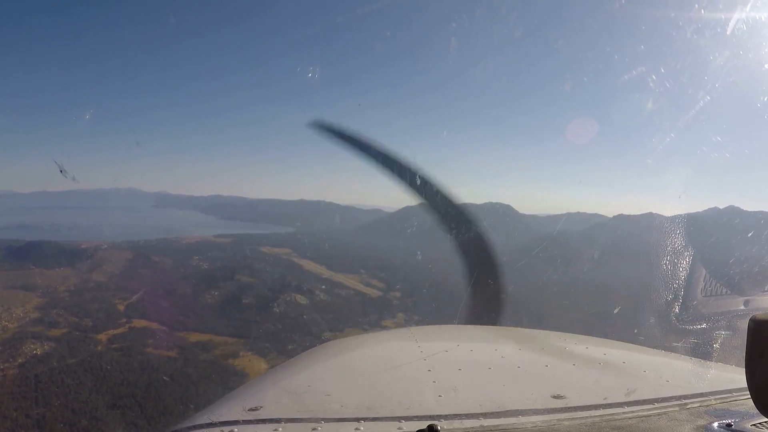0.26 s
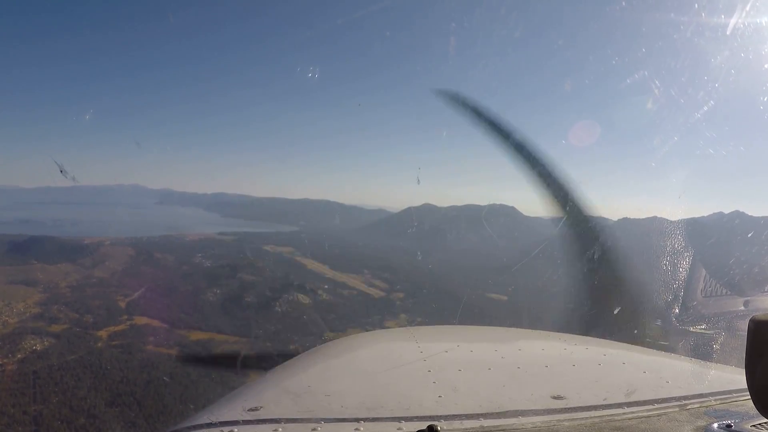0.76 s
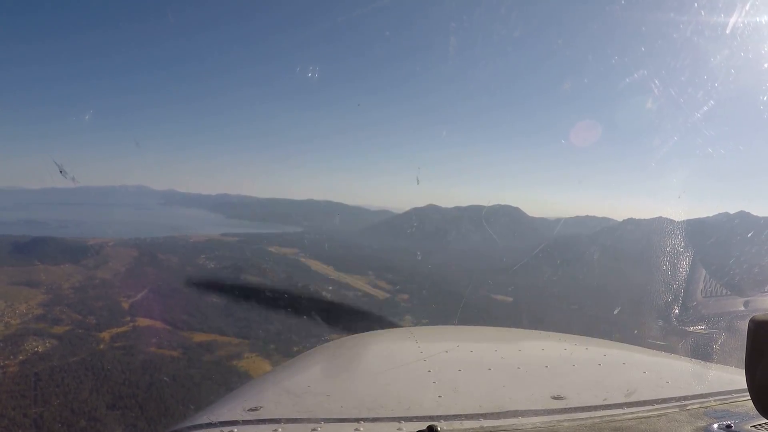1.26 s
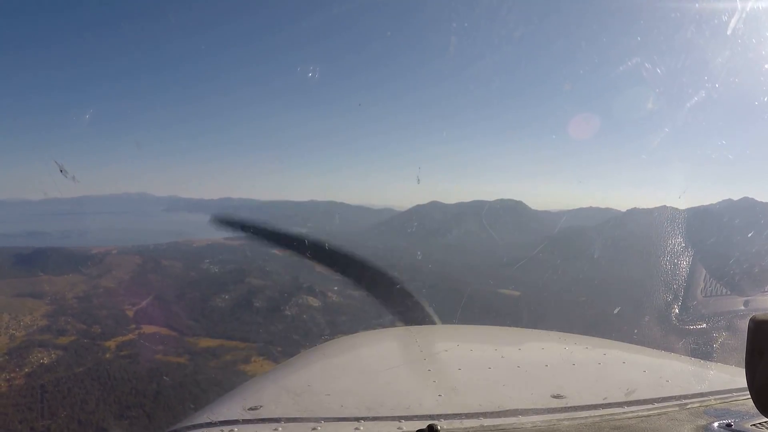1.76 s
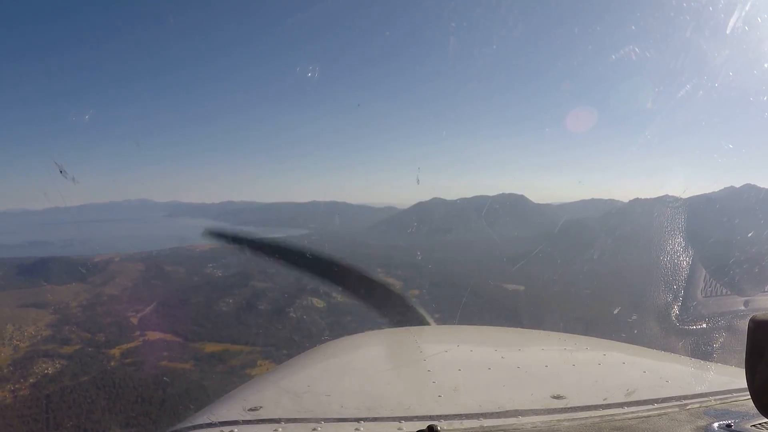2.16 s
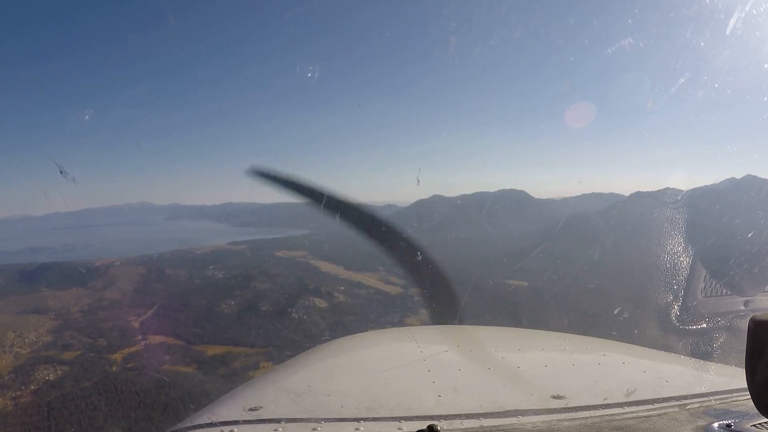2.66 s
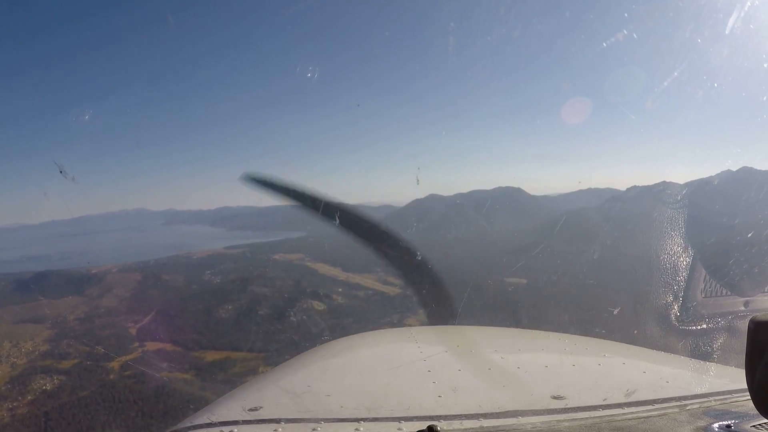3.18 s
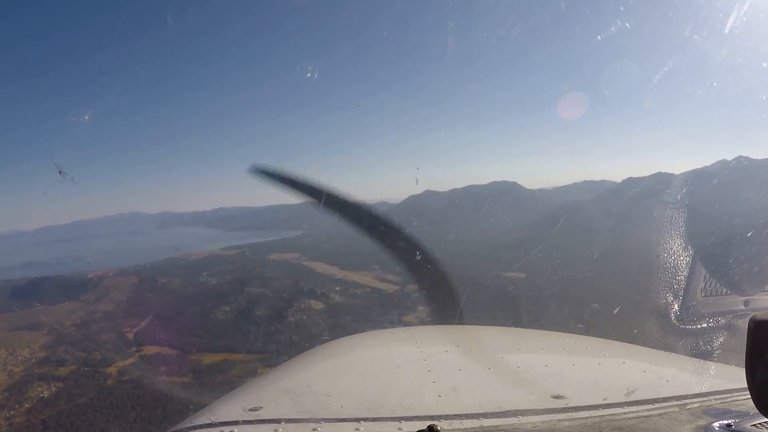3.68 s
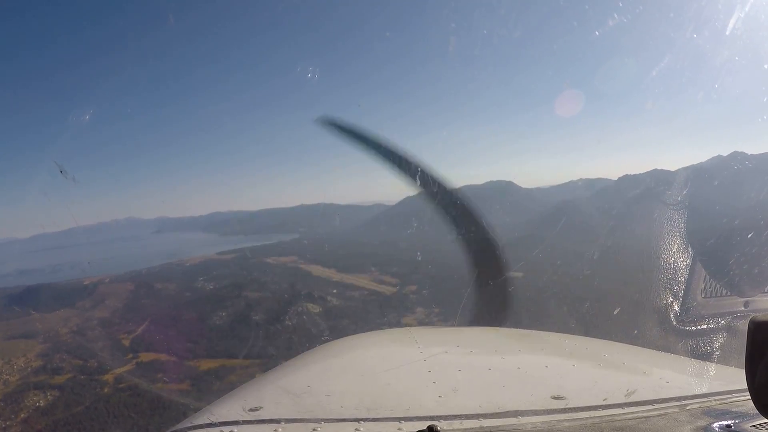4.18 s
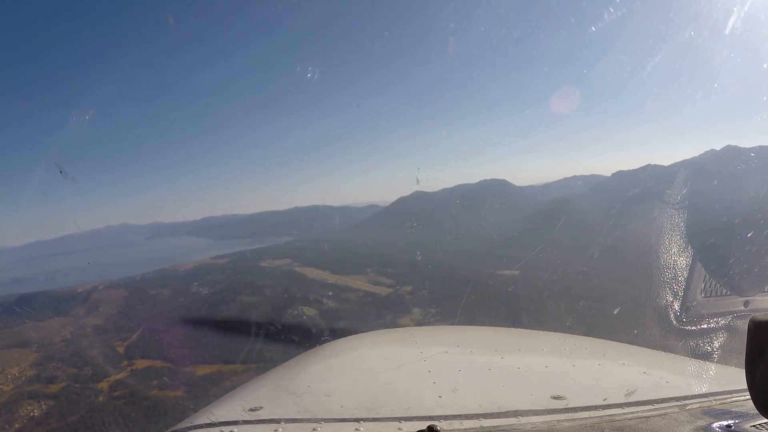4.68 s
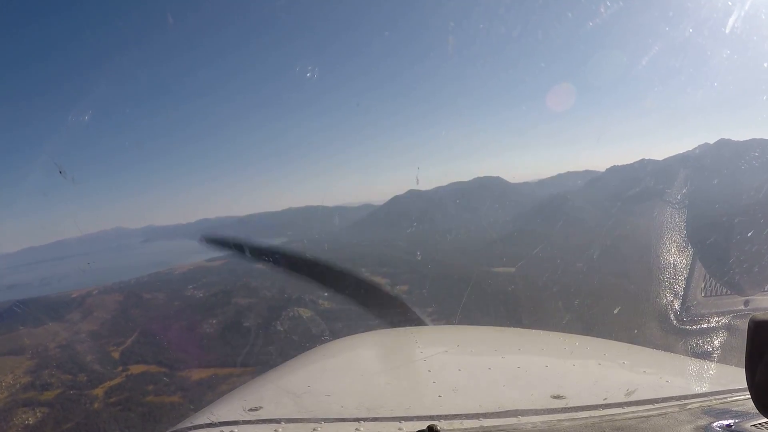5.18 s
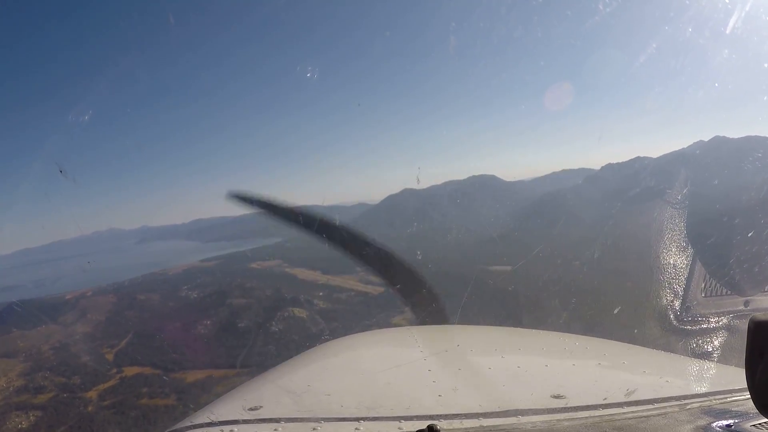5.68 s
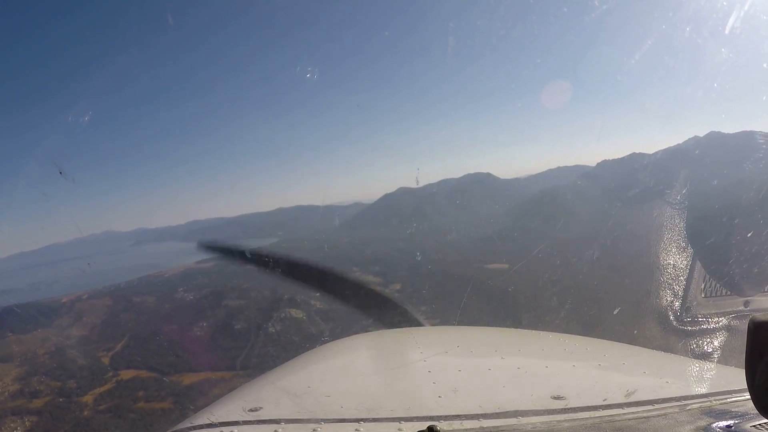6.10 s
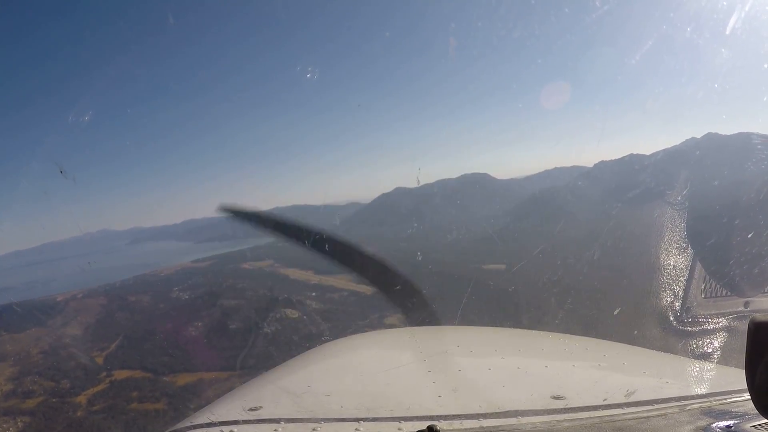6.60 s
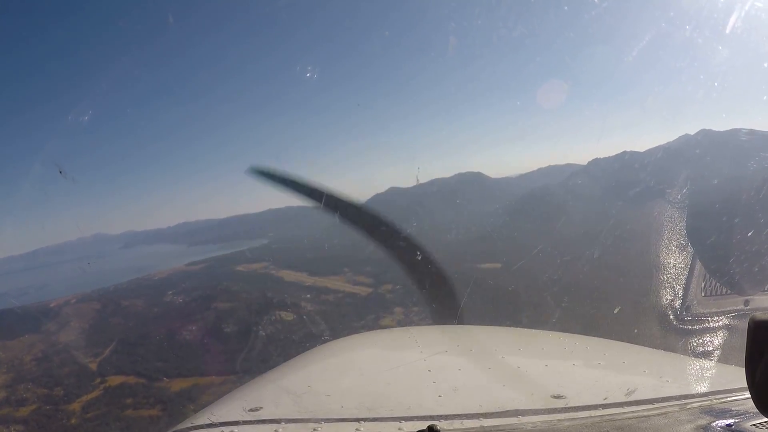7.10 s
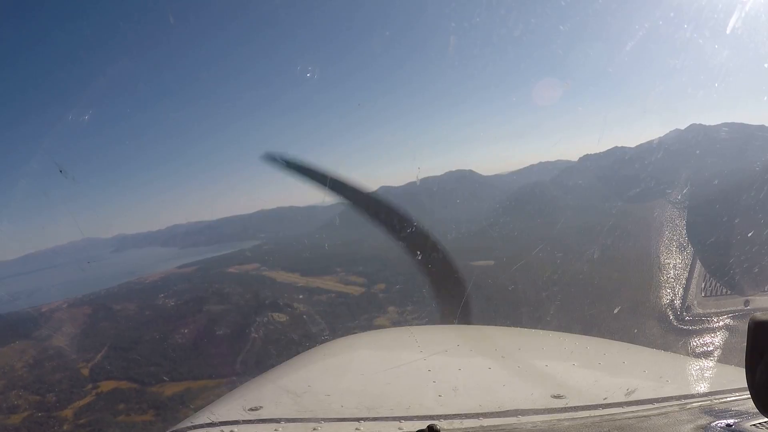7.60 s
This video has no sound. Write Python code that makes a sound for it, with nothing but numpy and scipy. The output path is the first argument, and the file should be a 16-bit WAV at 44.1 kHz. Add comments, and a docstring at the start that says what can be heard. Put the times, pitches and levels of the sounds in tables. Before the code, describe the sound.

Continuous cockpit noise of a light propeller aircraft: deep bassy hum from engine and blades together, faint higher engine tones, and a dense coloured rush of slipstream. The level stays almost even from beginning to end. Just before four seconds, two tiny puffs of crisp high noise pass, while engine speed wavers barely noticeably. The sound is enclosed and boxy, captured inside the small cabin.

```python
"""Inside the cockpit of a light four-cylinder aircraft with a two-blade propeller, in level flight.
Firings and blade passes fall together in one low drone, a sine at two beats per crank turn; more sines
follow the higher engine orders. One slow wavering sine is the shaking airframe. The slipstream roars over it:
flickering noise coloured by cabin and housing. A brief double rustle of bright noise passes in the treble."""
import sys
import numpy as np
from scipy import signal
from scipy.fft import rfft, irfft, next_fast_len
from scipy.io import wavfile

SR = 44100
rng = np.random.default_rng(int(sys.argv[2]) if len(sys.argv) > 2 else 0)


def bounce(signal):
    """Save signal as a 16-bit WAV file at the path given by the first command-line argument."""
    frames = np.transpose(np.atleast_2d(signal))
    limited = np.clip(frames, -1, 1)
    pcm = np.round(limited * 32767).astype(np.int16)
    wavfile.write(sys.argv[1], SR, pcm)


N = 346185

# Levels in dB rms; wavers in dB or radians rms; corner in Hz of the slow drift where given
DRONE_DB, DRONE_WAVER_DB, DRONE_WAVER_HZ = -21.5, 0.44, 1
ORDER_WAVER_DB, ORDER_WAVER_RAD = 1.3, 0.4
SHAKE_HZ, SHAKE_DB, SHAKE_WAVER_DB, SHAKE_WAVER_HZ = 19.4, -24, 2.5, 1.1
# Slow gusts swing the buffeting bass and the rush above it
GUST_HZ, GUST_BASS_DB, GUST_RUSH_DB = 0.77, 0.07, 0.14
BASS_HZ, TREBLE_HZ = 300, 1500  # where bass gives way to rush, and rush to treble
RUSTLE_LOW_HZ, RUSTLE_HIGH_HZ = 6460, 9800
RUSTLE_ATTACK_S, RUSTLE_RELEASE_S = .015, .025
ECHO_DB, ECHO_DECAY_S = -18.5, 0.011  # all echoes together, against the direct sound
RUMBLE_CUT_HZ, TOP_CUT_HZ = 14, 15280


def from_db(db):
    """Amplitude factor of a level in dB."""
    return 10 ** (np.asarray(db) / 20)


def rms_one(x):
    """Scale a signal to an rms of 1."""
    return x / np.sqrt(np.mean(x ** 2) + 1e-20)


def drift(corner_hz):
    """Slow chance of rms 1: coarse noise through a double one-pole low-pass, already run in."""
    step = 100  # samples between coarse points
    pole = np.exp(-2 * np.pi * corner_hz * step / SR)
    coarse = rng.standard_normal(N // step + 2002)
    slow = signal.lfilter([1], [1, -2 * pole, pole * pole], coarse)[2000:]
    return np.interp(np.arange(N) / step, np.arange(len(slow)), rms_one(slow))


def band(x, edges_hz, kind, order=2):
    """Butterworth filter: low, high or band pass."""
    return signal.sosfilt(signal.butter(order, edges_hz, kind, fs=SR, output="sos"), x)


def crank_angle():
    """Crank angle in radians, summed from an engine speed that sags slowly with a dip and an overshoot."""
    # Each row: time in seconds, crank speed in turns per minute.
    speed_rows = [(0.0, 1572), (2.5, 1571), (3.3, 1559), (3.65, 1561), (4.2, 1580), (4.8, 1575),
                  (5.4, 1568), (7.0, 1565), (7.5, 1561), (7.85, 1565)]
    time_s, speed_rpm = np.transpose(speed_rows)
    rpm = np.interp(np.arange(N) / SR, time_s, speed_rpm)
    return np.cumsum(rpm) / 60 * 2 * np.pi / SR


def engine(crank):
    """Sines locked to the crank angle; each higher order arrives by its own path and wavers."""
    # Higher engine orders: each entry a multiple of the crank rate; half orders come from unlike cylinders.
    multiples = [4, 6, 8.5, 9, 10, 12, 13, 14, 26, 26.5, 27, 28, 28.5, 30, 30.5, 32.5, 33.5]
    # Levels of those orders: each entry in dB rms.
    levels_db = [-35.5, -60.5, -54, -48.5, -44, -55.5, -55, -53, -49.5, -53.5, -49, -43, -57, -52, -59,
                 -54.5, -60]
    drone_level = from_db(DRONE_DB + DRONE_WAVER_DB * drift(DRONE_WAVER_HZ))
    out = drone_level * np.sin(2 * crank)
    for multiple, level_db in zip(multiples, levels_db):
        angle = multiple * crank + rng.normal(0, 1.14) + ORDER_WAVER_RAD * drift(1.0)
        out += from_db(level_db + ORDER_WAVER_DB * drift(2.0)) * np.cos(angle)
    return np.sqrt(2) * out  # from rms to peak


def shake():
    """One slow bending mode of the airframe, wandering a little in phase."""
    angle = 2 * np.pi * SHAKE_HZ * np.arange(N) / SR + .6 * drift(1.0)
    level = from_db(SHAKE_DB + SHAKE_WAVER_DB * drift(SHAKE_WAVER_HZ))
    return np.sqrt(2) * level * np.sin(angle)


def slipstream(crank):
    """White noise in ranges that flicker apart; every blade pass swells the middle one."""
    gust = drift(GUST_HZ)
    white = rng.standard_normal((2, N))
    bass_flicker_db = 1.13 * drift(10.3)
    bass = band(white[0], BASS_HZ, "low") * from_db(GUST_BASS_DB * gust + bass_flicker_db)

    blade_pass = 1 + 0.1 * np.cos(2 * crank)
    middle = band(band(white[1], BASS_HZ, "high"), TREBLE_HZ, "low")
    rush = middle * blade_pass * from_db(.5 * drift(7.0))

    # Treble in half-octave bands, taking the two noises by turns
    edges_hz = TREBLE_HZ * 2. ** np.arange(0, 4, .5)
    for k, (low, high) in enumerate(zip(edges_hz, edges_hz[1:])):
        rush += band(white[k % 2], [low, high], "band") * from_db(.55 * drift(6))
    return bass + rush * from_db(GUST_RUSH_DB * gust)


def rustle():
    """Two puffs of grainy bright noise: quick rise, short hold, slower fall."""
    # Each row: start in seconds, hold in seconds, level in dB against the roar.
    puffs = [(3.908, .035, 3.5), (3.978, .012, 1.5)]
    t = np.arange(N) / SR
    envelope = np.zeros(N)
    for start_s, hold_s, level_db in puffs:
        corners_s = start_s + np.cumsum([0, RUSTLE_ATTACK_S, hold_s, RUSTLE_RELEASE_S])
        envelope += from_db(level_db) * np.interp(t, corners_s, [0, 1, 1, 0])
    noise = band(rng.standard_normal(N), [RUSTLE_LOW_HZ, RUSTLE_HIGH_HZ], "band")
    grain = from_db(2.0 * drift(40))
    return envelope * grain * noise


def cabin(air):
    """The slope of the roar, the resonances, and a spray of weak early echoes that ripples the spectrum."""
    # Slope of the roar ahead of the resonances. Each row: frequency in Hz, level in dB per Hz.
    roar = [(24, -44.5), (45, -42.5), (60, -49), (90, -50), (160, -58), (300, -62.5), (450, -69),
            (900, -73), (1600, -79.5), (2300, -83), (3900, -83), (4900, -88), (7000, -84.5), (8000, -90.5),
            (11800, -95.5), (15200, -101)]
    # Broad resonances of cabin and housing. Each row: centre in Hz, width in Hz, lift in dB.
    resonances = [(200, 35, 3), (240, 100, 5.5), (717, 190, 13), (814, 150, 3.5), (994, 88, 8),
                  (1162, 140, 8), (1247, 60, 7), (1429, 396, 8), (1803, 212, 9.5), (2024, 160, 9),
                  (2378, 480, 11), (2677, 245, 4.5), (3010, 400, 13), (3418, 220, 7.2), (3600, 480, 5.5),
                  (4160, 85, 3), (4470, 660, 10.5), (5426, 800, 10.5), (5805, 500, 7), (6256, 484, 11.3),
                  (6690, 220, 4), (8620, 550, 4.5), (9935, 1400, 4.5), (10680, 239, 5.5), (11190, 544, 4),
                  (12800, 800, 4.5), (14030, 630, 6.0)]
    # Narrower panel modes and cancellations. Each row: centre in Hz, width in Hz, lift in dB (negative cuts).
    panels = [(1335, 86, 3), (2777, 77, -5.5), (3090, 24, 1.5), (3690, 65, 2), (3970, 130, 3),
              (4385, 48, 2)]
    size = next_fast_len(N)
    hz = np.maximum(np.arange(size // 2 + 1) * SR / size, 1)
    roar_hz, roar_db = np.transpose(roar)
    colour_db = np.interp(np.log(hz), np.log(roar_hz), roar_db)
    for centre_hz, width_hz, lift_db in [*resonances, *panels]:
        colour_db = colour_db + lift_db / (1 + (2 * (hz - centre_hz) / width_hz) ** 2)

    echo_s = np.arange(SR // 10) / SR
    spray = rng.standard_normal(SR // 10) * np.exp(-echo_s / ECHO_DECAY_S)
    spray /= np.sqrt(np.sum(spray ** 2))
    echoes = 1 + from_db(ECHO_DB) * rfft(spray, size)
    per_hz = np.sqrt(SR / 2)  # brings unit white noise to 0 dB per Hz
    return irfft(rfft(air, size) * echoes * from_db(colour_db) * per_hz, size)[:N]


def scene():
    """All sources at one microphone; only the moving air takes the cabin's colour."""
    crank = crank_angle()
    air = slipstream(crank) + rustle()
    return (engine(crank) + shake() + cabin(air))[None]


def record(dry):
    """The deepest rumble is cut, and a steep elliptic low-pass takes off the top."""
    passed = band(dry, RUMBLE_CUT_HZ, "high", order=6)
    top_cut = signal.ellip(14, .5, 60, TOP_CUT_HZ, fs=SR, output="sos")  # .5 dB ripple, 60 dB stop
    return signal.sosfilt(top_cut, passed)


dry = scene()
out = record(dry)
bounce(out)
```